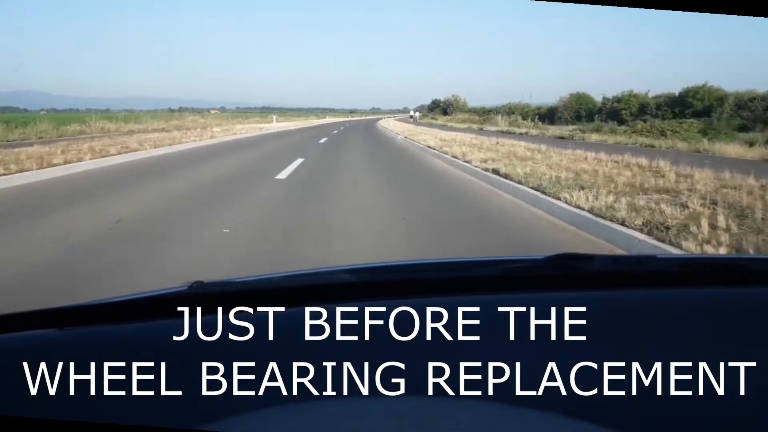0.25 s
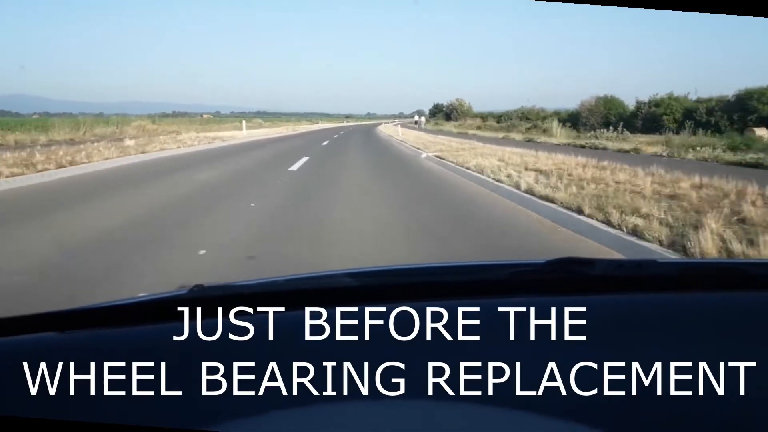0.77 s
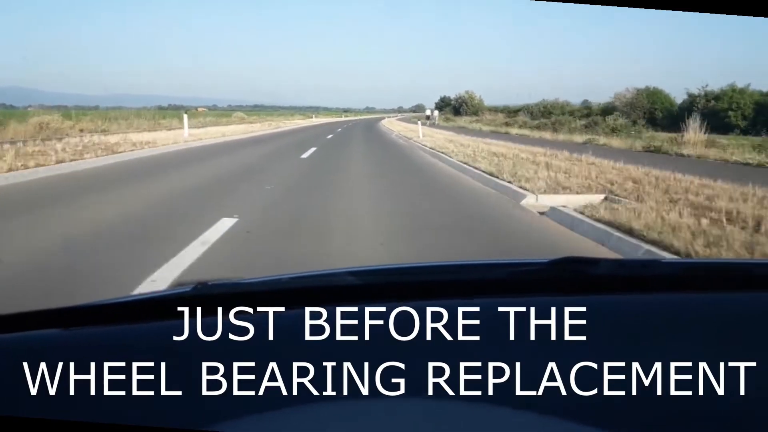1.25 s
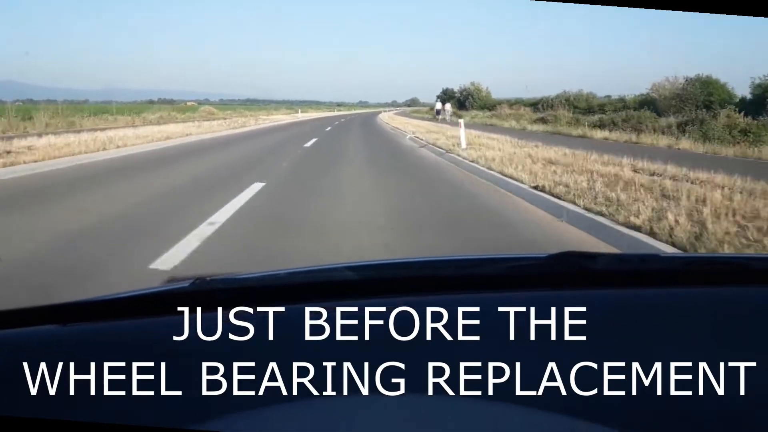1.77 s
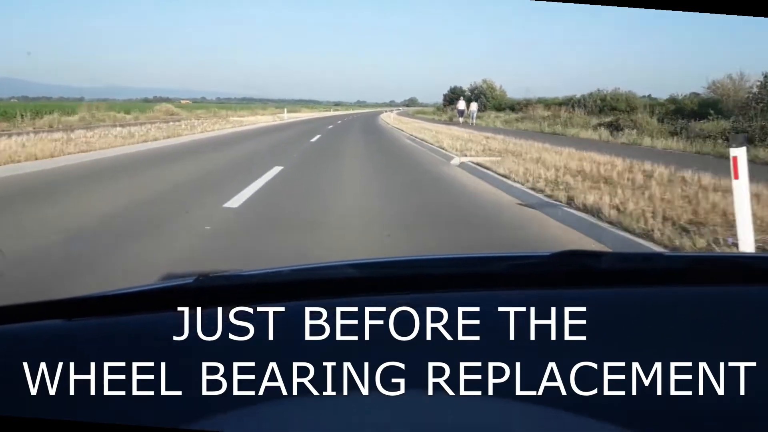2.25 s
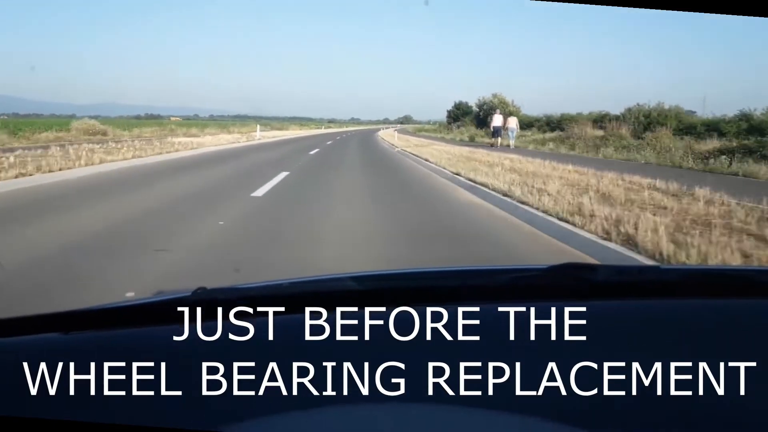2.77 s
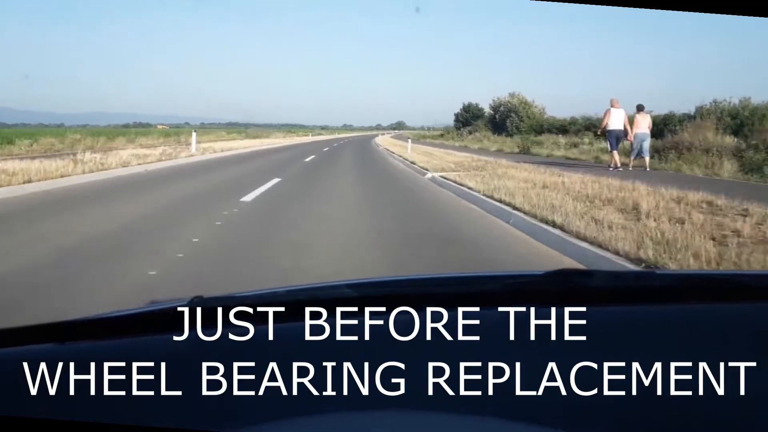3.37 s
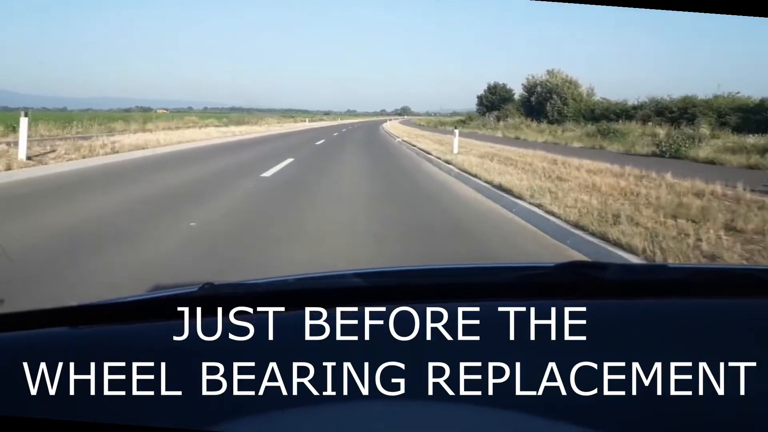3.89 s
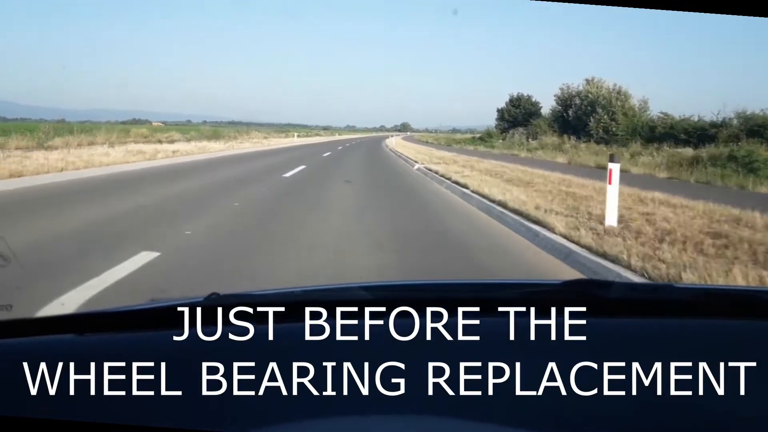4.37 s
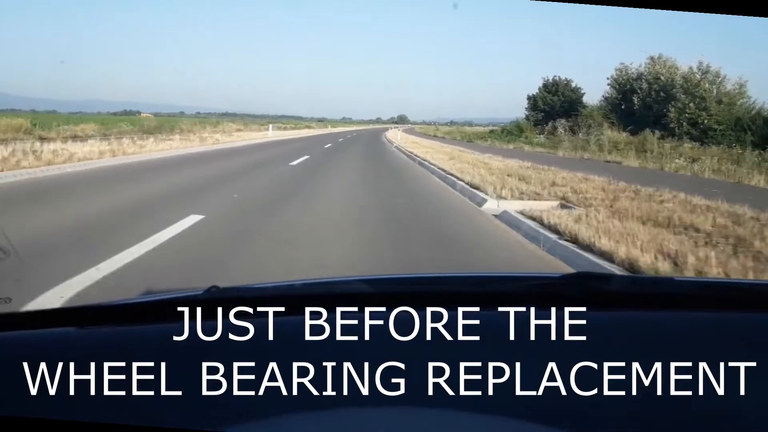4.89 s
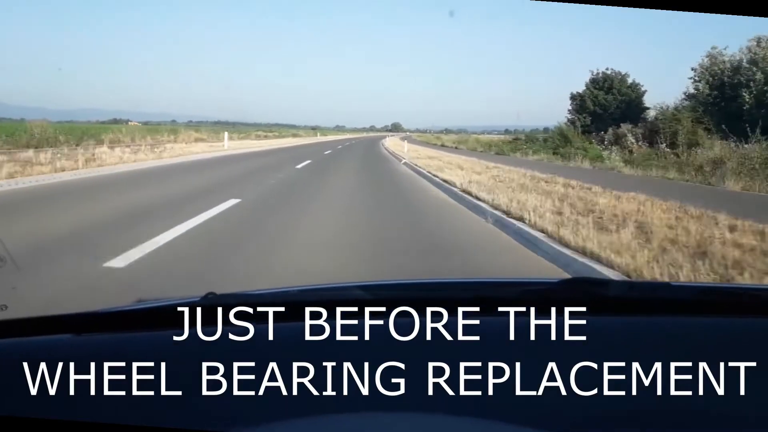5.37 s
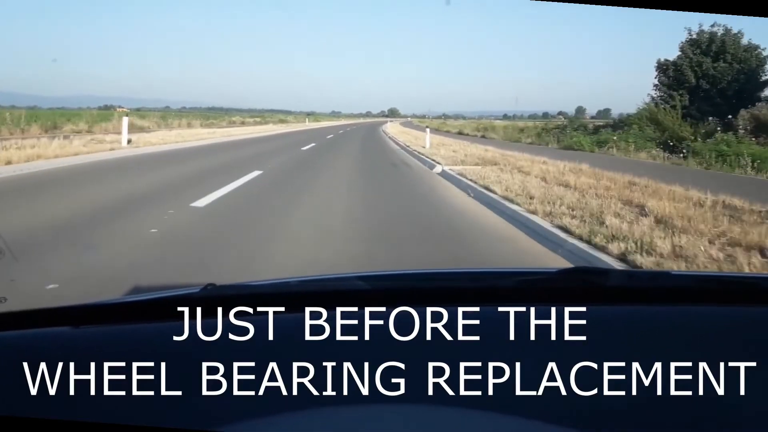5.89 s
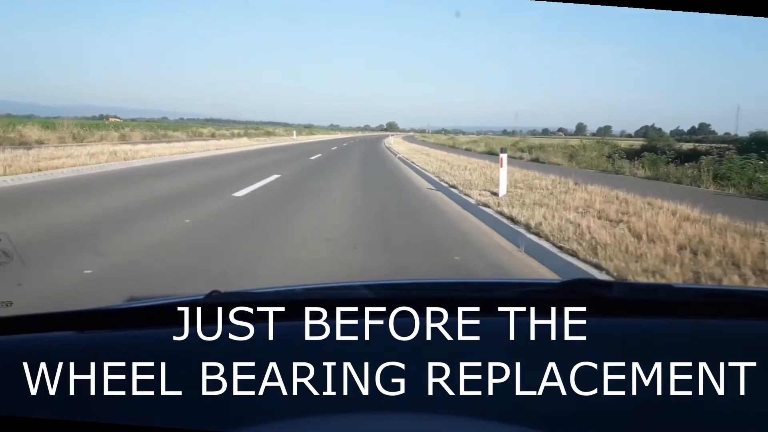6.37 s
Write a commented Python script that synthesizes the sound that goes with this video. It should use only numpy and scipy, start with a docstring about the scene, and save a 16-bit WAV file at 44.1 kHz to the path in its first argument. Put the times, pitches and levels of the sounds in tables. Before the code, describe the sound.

Inside a cruising car, a worn wheel bearing drones steadily over engine hum and tyre roar.

```python
"""Inside a car cruising on a country road, with one worn wheel bearing.
The bearing's steel balls roll over pits in its two rings, and each ring makes its own stack of tones.
One of these tones booms in the car body as a swelling drone. Under it run the engine, road rumble,
tyre roar and wind on the glass; now and then the plastic trim ticks."""
import sys
import numpy as np
from scipy import signal
from scipy.fft import rfft, irfft, next_fast_len
from scipy.io import wavfile

SR = 44100
rng = np.random.default_rng(int(sys.argv[2]) if len(sys.argv) > 2 else 0)


def generate_wav(signal):
    """Clip the signal to [-1, 1] and save it as 16-bit WAV at the path in sys.argv[1]."""
    frames = np.transpose(np.atleast_2d(signal))
    scaled = np.clip(frames, -1, 1) * 32767
    pcm = np.round(scaled).astype(np.int16)
    wavfile.write(sys.argv[1], SR, pcm)


N = 292824
TIME = np.arange(N) / SR


def undb(db):
    """Turn decibels (dB) into a number to multiply a sound by."""
    return 10 ** (np.asarray(db) / 20)


def waver(rate):
    """A smooth random wobble, about 1 in size, changing about rate times a second."""
    coarse = np.linspace(0, N / SR, 2048)
    hz = np.fft.rfftfreq(len(coarse), coarse[1])
    wobble = irfft(rfft(rng.standard_normal(len(coarse))) / (1 + (hz / rate) ** 2))
    return np.interp(TIME, coarse, wobble / wobble.std())


def noise(spectrum):
    """Noise shaped by rows of frequency in Hz and strength in dB per Hz."""
    hz, db = np.transpose(spectrum)
    size = next_fast_len(N)
    bins = np.maximum(np.fft.rfftfreq(size, 1 / SR), 1)
    gain = undb(np.interp(np.log(bins), np.log(hz), db)) * (bins < hz[-1])
    return irfft(rfft(rng.standard_normal(size)) * gain, size)[:N] * np.sqrt(SR / 2)


def tone(cycles, db):
    """A pure tone that follows a running count of cycles, starting anywhere in its cycle."""
    phase = 2 * np.pi * ((cycles + rng.random()) % 1)
    return np.sqrt(2) * undb(db) * np.sin(phase)


def hum(turns, table, waver_db, waver_rate):
    """The tones of a spinning part, each wavering in level as the load changes."""
    return sum(tone(multiple * turns, db + waver_db * waver(waver_rate)) for multiple, db in table)


# A faint, high hiss. Each row: frequency in Hz, base strength in dB per Hz.
TREBLE_FLICKER = [(3000, -125), (6500, -104), (8500, -105), (10500, -110), (15700, -122)]
def treble_flicker():
    """A faint, high hiss that flickers on and off at random."""
    return noise(TREBLE_FLICKER) * np.clip(waver(6.5), 0, 1.5)


# The wind's hiss. Each row: frequency in Hz, strength in dB per Hz.
WIND_HISS = [(1500, -89.5), (2700, -81), (3100, -84), (3500, -82), (4350, -80.5), (5300, -90), (6000, -91),
             (7050, -89), (7900, -104), (10000, -109), (16000, -108)]
def wind():
    """Air hisses along the glass."""
    return noise(WIND_HISS) * undb(.48 * waver(5))


# Road and tyre noise in the cabin. Each row: frequency in Hz, strength in dB per Hz.
ROAD_RUMBLE = [(10, -75.5), (23, -68.5), (33, -55), (41, -45.5), (49, -53.5), (57, -44), (70, -49),
               (100, -44), (118, -37), (138, -40.5), (200, -45.5), (300, -50.5), (350, -47.5), (700, -72.5)]
TYRE_ROAR = [(200, -67), (420, -56), (560, -56.5), (690, -59.5), (830, -57), (1150, -59.5), (1500, -63),
             (1750, -66), (1990, -64.5), (2250, -70), (2450, -77.5), (3100, -92.5), (6000, -120)]
def road(passes):
    """Asphalt shakes the body, and the tyres roar with a grind each time a bearing ball passes."""
    rumble = noise(ROAD_RUMBLE) * undb(.5 * waver(4.8))
    grind = 1 + .12 * np.cos(2 * np.pi * passes) + .096 * np.cos(2 * np.pi * DRONE_MULTIPLE * passes)
    roar = noise(TYRE_ROAR) * grind * undb(.5 * waver(4.3))
    return rumble + roar


def tick(start_s, db, hz, fade_s, rise_s=.0006):
    """One slip of plastic: a burst of bright noise that drops 60 dB in fade_s seconds."""
    age = np.arange(SR // 10) / SR
    b, a = signal.iirpeak(hz, Q=2, fs=SR)
    ring = signal.lfilter(b, a, rng.standard_normal(len(age)))
    loudness = undb(db - 60 * age / fade_s) * (1 - np.exp(-age / rise_s))
    return np.pad(loudness * ring / ring.std(), (int(start_s * SR), N))[:N]


# The clearer ticks of the trim. Each row: start in seconds, level in dB, pitch in Hz.
TRIM_TICKS = [(.487, -50, 6800), (.997, -61, 13000), (3.921, -53, 13000), (5.762, -42, 5500),
              (5.821, -45, 4960), (6.404, -57, 12000)]
def trim(faint_count=14):
    """Plastic trim slips and ticks: a few times clearly, and faintly at random moments."""
    clear = sum(tick(start_s, db, hz, fade_s=.055) for start_s, db, hz in TRIM_TICKS)
    faint = sum(tick(rng.uniform(0, N / SR), db=rng.uniform(-65, -60), hz=11500, fade_s=.018)
                for _ in range(faint_count))
    return clear + faint


# The wheels' low tones. Each row: vibrations per wheel turn, level in dB.
WHEEL_TONES = [(2, -48), (3, -40.5), (4, -37), (6, -42.5), (8, -28)]
def wheels(turns):
    """Wheels that are not quite round hum as they roll."""
    return hum(turns, WHEEL_TONES, waver_db=.5, waver_rate=1.5)


# The engine's weaker tones. Each row: vibrations per engine turn, level in dB.
ENGINE_TONES = [(4, -31.5), (6, -43), (6.5, -37), (8, -35), (8.5, -47.5), (10, -39.5), (10.5, -42),
                (12.5, -45.5), (24, -42.5)]
def engine(turns):
    """A four-cylinder engine fires twice a turn; weaker tones hum above that."""
    firing = tone(2 * turns, db=-22 + 1.5 * waver(2))
    return firing + hum(turns, ENGINE_TONES, waver_db=2.5, waver_rate=1.8)


def hub(turns, whine_db, pitch_hz=1990, width_hz=110, base_db=-49):
    """Rough metal rolling on metal makes the wheel hub ring, throbbing twice a turn."""
    b, a = signal.iirpeak(pitch_hz, pitch_hz / width_hz, fs=SR)
    ring = signal.lfilter(b, a, signal.lfilter(b, a, rng.standard_normal(N)))
    throb = 1 + .74 * np.cos(4 * np.pi * turns)
    return ring / ring.std() * undb(base_db + whine_db) * throb


# The inner ring's tones, at 2, 3, 4, .. vibrations per passing ball.
# Each row: level in dB, level of the side tone below in dB, level of the side tone above in dB.
INNER_TONES = [(-28, -26.5, -31.5), (-40.5, -35.5, -39), (-47, -41.5, -44.5), (-51.5, -41.5, -45),
               (-48, -55, -46), (-41, -47.5, -46.5), (-43.5, -47, -51.5), (-51.5, -53.5, -53),
               (-48.5, -55, -54), (-49.5, -45, -50.5), (-51, -54.5, -51), (-54.5, -57, -65)]
def inner_ring(passes, turns, boom_db=-17.5):
    """This pit turns with the wheel, in and out of the load, adding side tones around its higher tones."""
    sound = tone(passes, boom_db)
    for multiple, (db, below_db, above_db) in enumerate(INNER_TONES, 2):
        cycles = multiple * passes
        # high tones sound only in the middle of the load, so their side tones spread further
        far_db = min(-14 + 1.7 * multiple, 0)
        group = tone(cycles, db)
        for side, side_db in ((-1, below_db), (1, above_db)):
            group += tone(cycles + side * turns, side_db)
            group += tone(cycles + 2 * side * turns, side_db + far_db)
        sound += group * undb(1.3 * waver(2.3))
    return sound


# The outer ring's tones. Each row: vibrations per passing ball, base level in dB.
OUTER_TONES = [(1, -43), (2, -25), (3, -29.5), (5, -36.5), (6, -29), (7, -29), (8, -45.5), (9, -41),
               (10, -43), (11, -38.5), (12, -42), (13, -38.5), (14, -47.5), (15, -52.5), (16, -46),
               (17, -46.5), (18, -47), (22, -45), (23, -53.5)]
def outer_ring(passes, whine_db):
    """The outer ring stands still, so the balls strike its pit evenly."""
    sound = np.zeros(N)
    for multiple, db in OUTER_TONES:
        # harder contact brings up only the high tones; they also waver most
        highness = np.clip((multiple - 8.5) / 4, 0, 1)
        waver_db = (1.1 + .61 * highness) * waver(2.3)
        sound += tone(multiple * passes, db + highness * (whine_db - .8) + waver_db)
    return sound


DRONE_MULTIPLE = 4  # vibrations per passing ball
def drone(passes, start_db=-28, peak_db=-12.5, peak_s=3.84, ease_db_per_s=1):
    """One outer-ring tone matches a pitch the car body rings at; it swells, then eases a little."""
    power = np.interp(TIME, [0, peak_s], undb([start_db, peak_db]) ** 2)
    db = 10 * np.log10(power) - ease_db_per_s * np.maximum(TIME - peak_s, 0)
    return tone(DRONE_MULTIPLE * passes, db + .5 * waver(2.7))


BALLS, OUTER_PASSES_PER_TURN, ENGINE_TURNS_PER_TURN = 15, 6.4295, 3.462  # per turn of the wheel
PASS_HZ, RISE_HZ_PER_S = 90.19, .115  # how often balls pass the outer pit, and how that rises
def scene():
    """The car gathers speed very slowly; bearing and engine keep step with the wheel."""
    steady_passes = np.cumsum(PASS_HZ + RISE_HZ_PER_S * TIME) / SR
    turns = steady_passes / OUTER_PASSES_PER_TURN
    # the cage holding the balls slips a little: the passes one ring gains, the other loses
    outer_passes = steady_passes + .004 * waver(4.6)
    inner_passes = BALLS * turns - outer_passes
    whine_db = 3 - TIME + waver(2)  # the high whine fades about 1 dB a second
    background = wind() + treble_flicker() + road(outer_passes) + trim() + wheels(turns)
    background += engine(ENGINE_TURNS_PER_TURN * turns)
    bearing = hub(turns, whine_db) + inner_ring(inner_passes, turns) + outer_ring(outer_passes, whine_db)
    return (background + bearing + drone(outer_passes))[None]


def record(dry, ceiling=.98, top_hz=15700):
    """Round off the tallest peaks and cut the highest treble."""
    rounded = dry / (1 + (dry / ceiling) ** 10) ** (1 / 10)
    return signal.sosfilt(signal.ellip(10, .1, 80, top_hz, fs=SR, output="sos"), rounded)


dry = scene()
out = record(dry)
generate_wav(out)
```